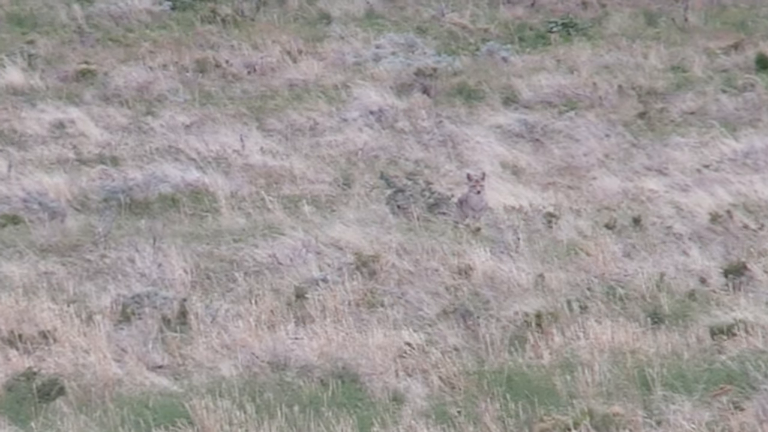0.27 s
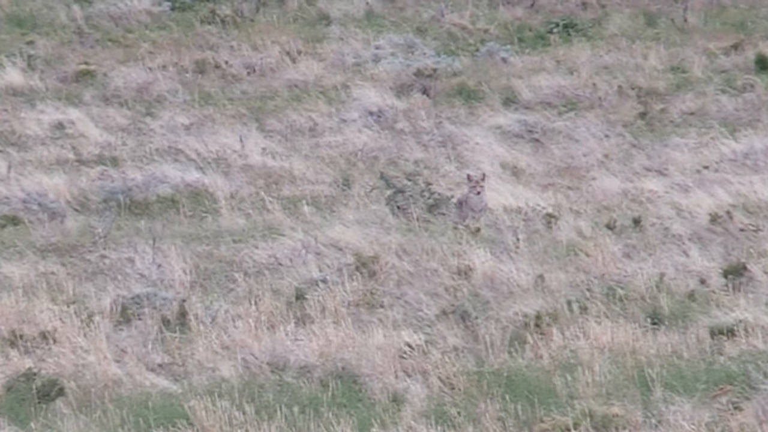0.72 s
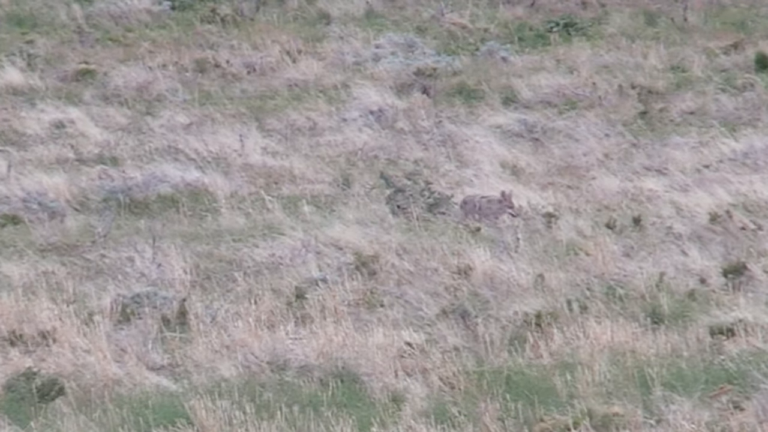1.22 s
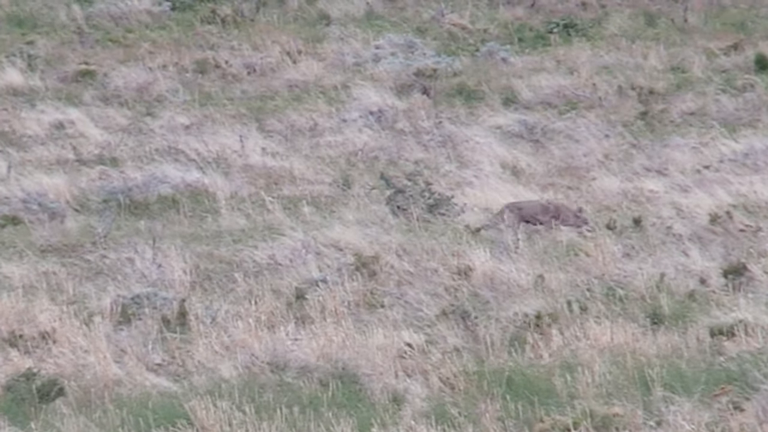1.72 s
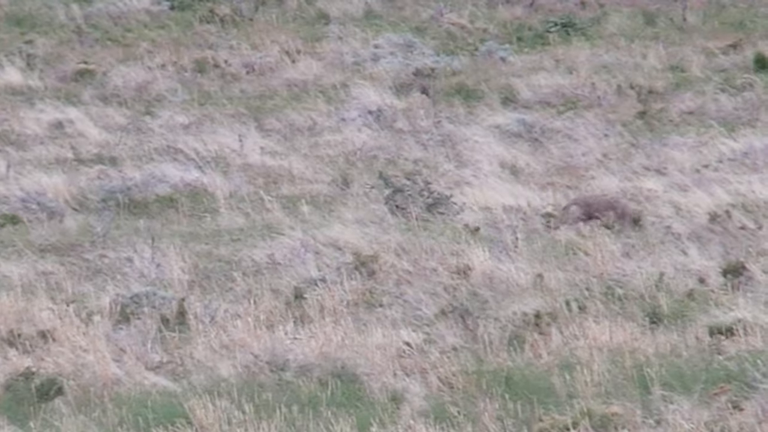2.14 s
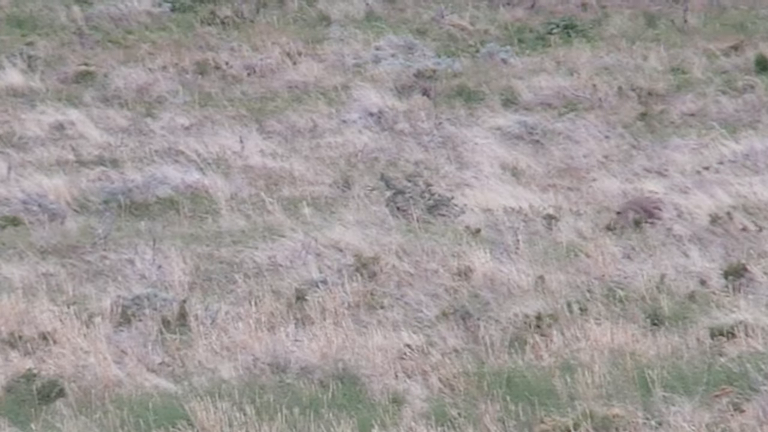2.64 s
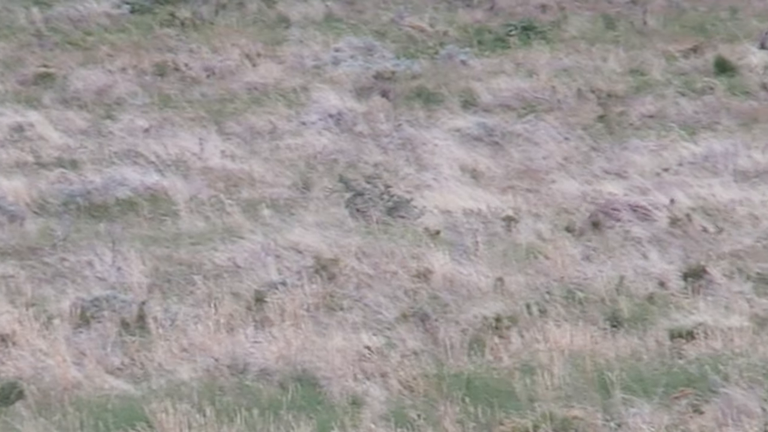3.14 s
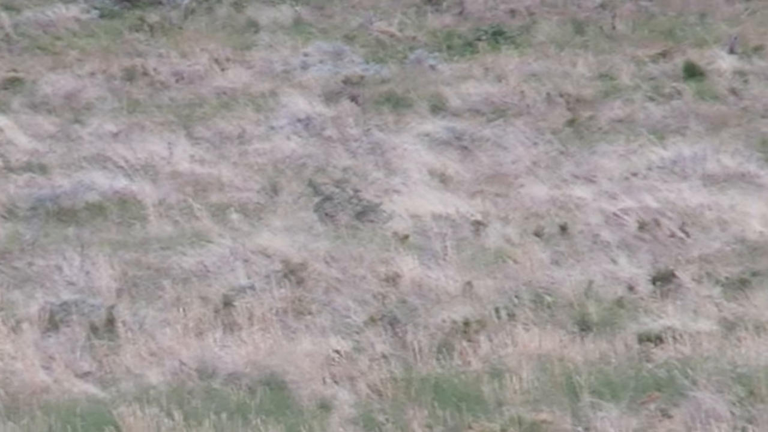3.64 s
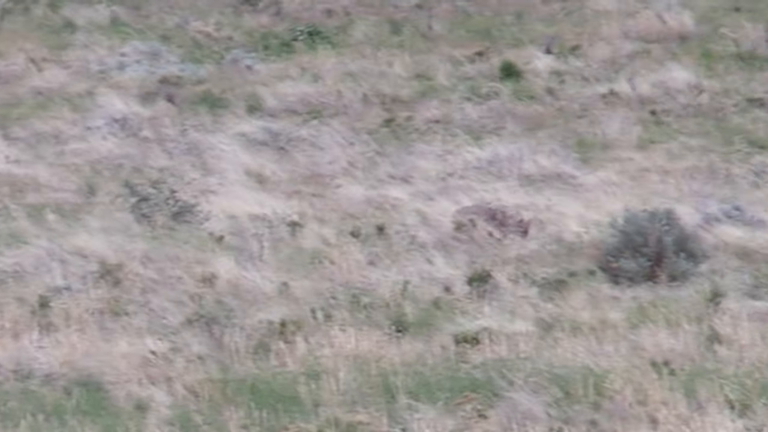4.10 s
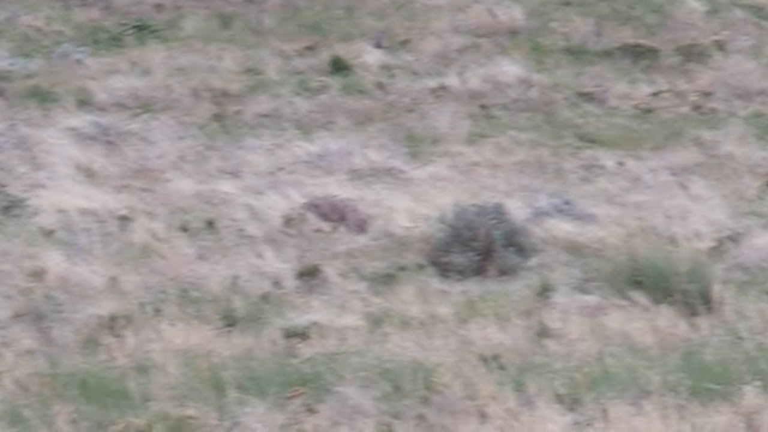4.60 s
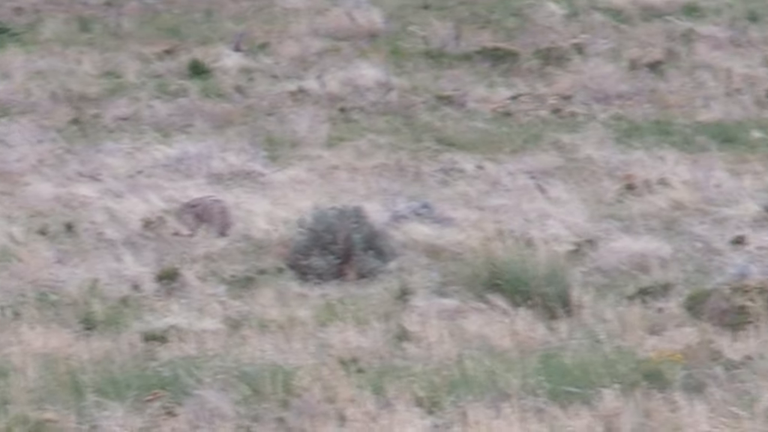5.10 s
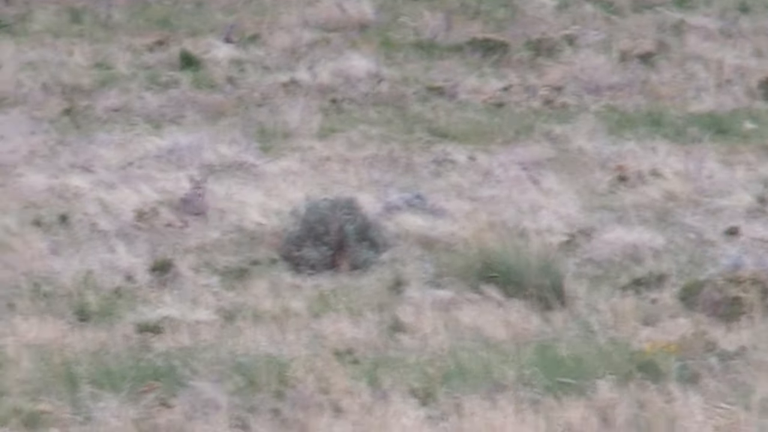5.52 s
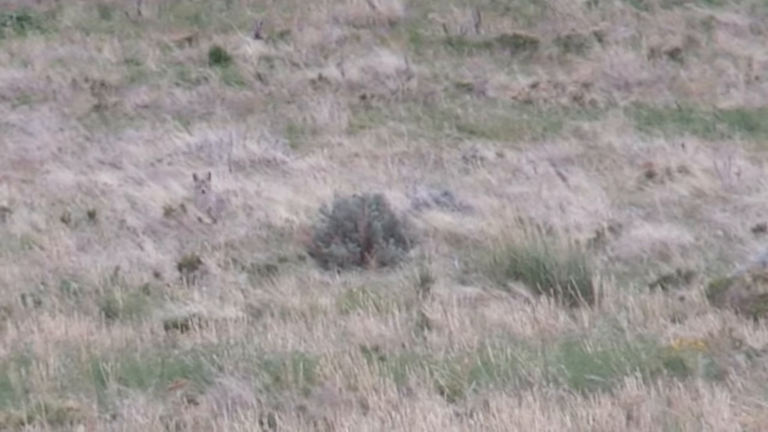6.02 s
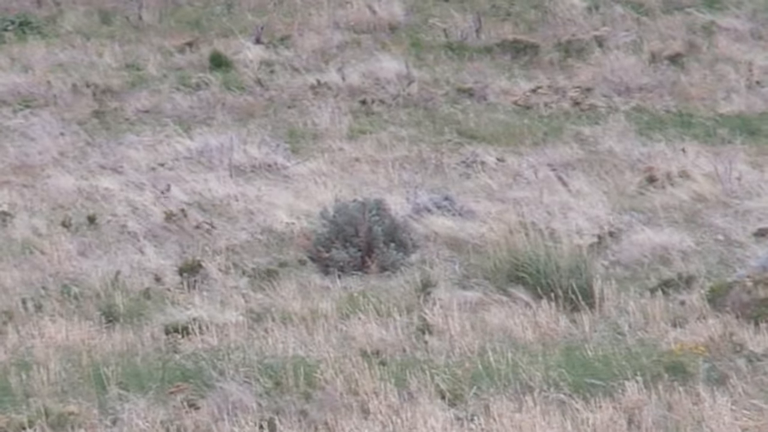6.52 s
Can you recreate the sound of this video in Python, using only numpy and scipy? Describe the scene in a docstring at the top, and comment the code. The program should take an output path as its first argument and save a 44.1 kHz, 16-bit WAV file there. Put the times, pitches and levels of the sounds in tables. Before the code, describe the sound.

Outdoors, thin wavering yips and drawn-out squeals come about three a second, a little right, with fainter calls to the left later on. Short echoes and scatter come back from the slope and brush. Deep wind buffets the camera microphone, first in loose thuds, then in near-overloading blows with a small dry tick among them. Calling ends around six seconds, leaving rumbling wind over soft hiss and hum.

```python
"""High squealing calls, clean yips, carry over an open grassy hillside, a little to the right, and echo off the slope.
Each yip is a wavering sine with patchy overtones; blurred noise taps make its echoes.
Gusts buffet the two microphone ports of a camera as shaped noise, with flaps and quick dull bursts.
Brief high glints with the yips, fainter calls to the left, a noise rasp and one damped tick lie over
the steady hiss and faint motor hum of the camera, which dip briefly at times."""
import sys
import numpy as np
from scipy import signal
from scipy.fft import rfft, irfft, next_fast_len
from scipy.io import wavfile
from scipy.ndimage import uniform_filter1d, minimum_filter1d

SR = 44100
rng = np.random.default_rng(int(sys.argv[2]) if len(sys.argv) > 2 else 0)


def voltage_ratio(level):
    """Linear amplitude factor for a level in decibels (scalar or array-like)."""
    return 10 ** (np.asarray(level, float) / 20)


def transcribe(u):
    """Save the signal u as a 16-bit wav file named by the first command-line argument.

    u: samples, shape (n,) or (channels, n), limited to [-1, 1]; the rate is SR.
    q: integer samples, one column per channel.
    """
    v = np.clip(np.atleast_2d(u).T, -1, 1)
    q = np.round(v * 32767).astype(np.int16)
    wavfile.write(sys.argv[1], SR, q)


N = 297653
TIME = np.arange(N) / SR
YIP_PAN_DB = -3.5  # left minus right

# relative colour of the eddies on a port: f/Hz, density/dB per Hz
WIND_COLOUR = [(3, -52), (12, -6), (22, 3), (45, -5.5), (75, -12), (110, -19), (200, -32.5), (330, -42.5),
               (600, -57.5), (1100, -79.5)]


def unit(x):
    """Scale to rms 1."""
    return x / np.sqrt(np.mean(x ** 2))


def read(table, hz):
    """dB of a spectrum, straight lines over log frequency."""
    table_hz, table_db = np.transpose(table)
    return np.interp(np.log(hz + 1e-9), np.log(table_hz), table_db)


def noise(table, lo_hz=0, hi_hz=1e9):
    """Noise with the table's colour, kept between two soft edges."""
    size = next_fast_len(N)
    hz = np.arange(size // 2 + 1) * SR / size + 1e-3
    edges = 1 / np.sqrt((1 + (lo_hz / hz) ** 8) * (1 + (hz / hi_hz) ** 8))
    white = rfft(rng.standard_normal(size))
    return irfft(white * voltage_ratio(read(table, hz)) * edges, size)[:N]


def walk(rate):
    """Random levels held 1 / rate s and slewed twice; rms 1."""
    hold = int(SR / rate)
    steps = np.repeat(rng.standard_normal(N // hold + 1), hold)
    return unit(uniform_filter1d(uniform_filter1d(steps, hold), hold)[:N])


def pan(x, db):
    """Place left or right by a level difference (left minus right)."""
    return np.array([x * voltage_ratio(db / 2), x * voltage_ratio(-db / 2)])


def fade(t, s):
    """Soft edges of s seconds on a note."""
    return np.clip(np.minimum(t - t[0], t[-1] - t) / s, 0, 1)


def bumps(table, column):
    """Sum of bell-shaped swells from rows (t/s, half width/s, ..)."""
    return sum(row[column] * np.exp(-((TIME - row[0]) / row[1]) ** 2) for row in table)


def yips():
    """High squealing calls: a near sine that wavers, roughens in fast glides, with two patchy overtones."""
    # one entry a yip: overtone brightness/dB, then its course of (t/s, pitch f/Hz, effort level/dB)
    courses = [ (-4, [(0.0, 1652, -50), (0.019, 1890, -32), (0.038, 1965, -35), (0.053, 2340, -42),
               (0.062, 2350, -59)]), (-5, [(0.355, 1250, -66), (0.364, 1290, -45), (0.376, 1713, -30.5),
               (0.388, 1710, -31), (0.396, 1855, -35), (0.409, 1850, -56)]), (0.5, [(0.628, 1350, -42),
               (0.635, 1322, -36), (0.655, 1500, -40), (0.663, 1780, -38), (0.674, 1900, -32.5),
               (0.691, 2004, -42), (0.702, 2135, -36), (0.719, 1950, -57)]), (-8, [(0.745, 2520, -60),
               (0.766, 2520, -47.5), (0.78, 2670, -53), (0.829, 2800, -58), (0.838, 2650, -70),
               (0.845, 2010, -36), (0.852, 1990, -65)]), (-3.5, [(0.955, 1750, -57), (0.961, 1737, -39.5),
               (0.977, 1783, -42), (0.989, 1870, -32), (1.02, 2014, -30.5), (1.034, 2140, -41),
               (1.063, 2050, -29.5), (1.086, 1837, -38), (1.14, 1886, -38), (1.156, 2060, -44),
               (1.161, 2680, -44), (1.172, 2660, -47.5), (1.183, 2040, -41), (1.192, 2050, -64)]),
               (-3.5, [(1.282, 1290, -54), (1.293, 1288, -44.5), (1.326, 1502, -37.5), (1.353, 1515, -40),
               (1.366, 1620, -34), (1.396, 1744, -35), (1.408, 1835, -45), (1.424, 2360, -53),
               (1.44, 2100, -47.5), (1.455, 1970, -51)]), (-5, [(1.56, 1630, -55), (1.567, 1542, -31.5),
               (1.597, 1765, -39), (1.607, 1970, -38), (1.613, 2550, -46), (1.628, 2420, -49),
               (1.645, 2696, -37), (1.714, 2686, -31), (1.775, 2762, -35.5), (1.797, 1870, -38.5)]),
               (1.5, [(1.922, 1940, -58), (1.927, 1965, -25), (1.935, 1878, -33), (1.941, 1604, -44),
               (1.959, 1820, -38), (1.968, 2150, -41), (1.999, 2560, -34), (2.009, 2700, -37),
               (2.048, 2530, -30), (2.128, 2490, -42.5), (2.157, 2620, -38.5), (2.169, 2930, -40),
               (2.191, 2100, -39.5), (2.2, 1960, -66)]), (-0.5, [(2.309, 1620, -39), (2.313, 1600, -28.5),
               (2.318, 1336, -43), (2.335, 1480, -48.5), (2.354, 1836, -38.5), (2.36, 2110, -37.5),
               (2.37, 2310, -44), (2.389, 2510, -40), (2.395, 2760, -36.5), (2.423, 2474, -34),
               (2.456, 2460, -35.5), (2.485, 2855, -36.5), (2.528, 2885, -42), (2.543, 2190, -34.5),
               (2.554, 2330, -67)]), (1, [(2.669, 1825, -42), (2.675, 1804, -31.5), (2.685, 1626, -34.5),
               (2.712, 1873, -34.5), (2.72, 1890, -45), (2.727, 2660, -42), (2.745, 2770, -41),
               (2.783, 2670, -28.5), (2.794, 2784, -41.5), (2.85, 2810, -48.5), (2.893, 2910, -57),
               (2.904, 2660, -36.5), (2.915, 2180, -47), (2.924, 2210, -59)]), (0, [(3.055, 1680, -48),
               (3.071, 1570, -32), (3.092, 1768, -39), (3.105, 1776, -40), (3.11, 2700, -40),
               (3.141, 2780, -51), (3.156, 2620, -35.5), (3.185, 2710, -37), (3.305, 2834, -44.5),
               (3.337, 1940, -49.5)]), (0, [(3.469, 1060, -54), (3.478, 1073, -41), (3.486, 1204, -40.5),
               (3.514, 1385, -46), (3.521, 1592, -47), (3.538, 1863, -38), (3.546, 2300, -39),
               (3.575, 2466, -37.5), (3.605, 2390, -37.5), (3.678, 2600, -34.5), (3.712, 2420, -40),
               (3.72, 2670, -43), (3.76, 2700, -61)]), (-2, [(3.895, 1148, -47), (3.906, 1178, -44),
               (3.914, 1280, -45), (3.93, 1425, -47.5), (3.941, 1805, -42), (3.946, 2270, -36),
               (3.972, 2600, -36), (3.989, 2380, -45), (4.01, 2410, -57), (4.034, 2190, -35.5),
               (4.056, 2400, -33), (4.129, 2543, -34.5), (4.146, 2690, -56), (4.16, 2620, -36),
               (4.169, 2440, -36), (4.21, 2600, -37), (4.228, 1870, -51)]), (-11, [(4.349, 1660, -60),
               (4.359, 1730, -45), (4.372, 1590, -57), (4.377, 1470, -56), (4.39, 2030, -33.5),
               (4.401, 2026, -44), (4.406, 2680, -46.5), (4.44, 2680, -51), (4.455, 2430, -37),
               (4.473, 2330, -55), (4.481, 2427, -37.5), (4.501, 2465, -37), (4.512, 2570, -41.5),
               (4.6, 2565, -44.5), (4.615, 2650, -56), (4.7, 2630, -63)]), (-4, [(4.808, 1550, -54),
               (4.813, 1552, -44.5), (4.824, 1712, -28), (4.837, 1786, -44), (4.842, 2214, -45),
               (4.858, 2220, -47), (4.893, 1960, -49), (4.92, 2000, -55)]), (-8, [(4.968, 1320, -58),
               (4.976, 1317, -50), (4.988, 1463, -54), (4.993, 1900, -47), (5.027, 2044, -32),
               (5.052, 1970, -57), (5.067, 2013, -51), (5.085, 2030, -65)]), (-20, [(5.12, 1980, -58),
               (5.14, 1960, -43), (5.153, 2100, -35), (5.166, 2660, -56), (5.173, 2670, -42),
               (5.189, 2680, -59)]), (-11, [(5.346, 1250, -47), (5.358, 1377, -41), (5.371, 1706, -51),
               (5.379, 1970, -37.5), (5.389, 2100, -39), (5.406, 2380, -62), (5.423, 2390, -59),
               (5.435, 2200, -40), (5.449, 2490, -52), (5.491, 2595, -39), (5.509, 2730, -60)]),
               (-15, [(5.53, 2570, -68), (5.562, 2520, -62), (5.569, 2300, -58), (5.609, 2260, -56)]),
               (-12.5, [(5.643, 1500, -58), (5.651, 1500, -49), (5.658, 1320, -46), (5.664, 1320, -40),
               (5.678, 1466, -41), (5.684, 1680, -50), (5.692, 1910, -35.5), (5.704, 1965, -48),
               (5.709, 2080, -41), (5.724, 2264, -38.5), (5.736, 2220, -74), (5.757, 2240, -64),
               (5.764, 2460, -51), (5.83, 2740, -60)]), (-25, [(5.97, 1326, -63), (5.99, 1296, -42),
               (6.005, 1506, -44), (6.015, 1660, -60), (6.021, 1820, -45), (6.034, 1826, -37.5),
               (6.045, 1640, -55), (6.064, 1640, -64)]), ]
    # overtones, rich in the low register and nearly gone in the squeal:
    # pitch f/Hz, level/dB before brightness and swells
    overtones = [(1075, -41), (1330, -40), (1480, -46), (1700, -54), (1830, -41), (1990, -52), (2140, -42),
                 (2300, -57), (2500, -66), (2800, -65)]
    # the overtones swell or drop for a moment: t/s, half width/s, change of level/dB
    overtone_swells = [(.68, 0.023, 6), (1.0, 0.016, -18), (1.08, 0.082, 3.5), (1.62, 0.0089, -6),
                       (1.69, .05, 12), (1.99, 0.01, 8), (2.1, 0.031, 14), (4, .02, -8), (4.81, .02, 5),
                       (5.36, 0.014, -10), (5.4, 0.017, 7), (5.685, 0.0077, 11)]
    # pass for the third partial: f/Hz, level/dB
    third_pass = [(3000, -15), (3600, -13.5), (4300, -3.5), (4700, -13), (5100, -30)]
    # resonance that lifts the second partial: f/Hz, half width/Hz, lift/dB
    peak_hz, peak_width_hz, peak_lift_db = (2780, 120, 2.4)
    faint_db = -44.5  # under this effort the overtones fade with the fundamental
    knee_db = -56  # overtones below this level fall away faster
    fall_dull_db, jump_dip_db = -9, -9

    out = np.zeros(N)
    drift = 0.0052 * walk(120)  # fraction of pitch
    swell = voltage_ratio(2 * walk(90))
    shake = .045 * walk(500)  # fraction of pitch
    patches_db = 3.5 * np.array([walk(70), walk(70)])
    swell_db = bumps(overtone_swells, column=2)
    for bright_db, course in courses:
        s, hz, db = np.transpose(course)
        span = slice(int(s[0] * SR), int(s[-1] * SR))
        t = TIME[span]
        pitch = uniform_filter1d(np.interp(t, s, hz), 120)
        glide = np.gradient(np.log2(pitch)) * SR  # octaves a second
        # the tone roughens in fast glides (full at 30 octaves a second)
        rough = np.clip(uniform_filter1d(np.abs(glide), 300) / 30, 0, 1)
        # the fundamental dips where the note jumps to another register
        jumping = np.clip(np.abs(glide) / 40 - 1, 0, 1)
        phase = 2 * np.pi * np.cumsum(pitch * (1 + drift[span] + rough * shake[span])) / SR
        effort_db = np.interp(t, s, db)

        over_db = bright_db + read(overtones, pitch) + swell_db[span]
        over_db += np.minimum(effort_db - faint_db, 0)
        # duller while the pitch drops away (from 8, full at 16 octaves a second)
        over_db += fall_dull_db * np.clip(-glide / 8 - 1, 0, 1)
        # weak overtones fall away faster
        over_db += 1.5 * np.minimum(over_db - knee_db, 0)
        peak_db = peak_lift_db * np.exp(-((2 * pitch - peak_hz) / peak_width_hz) ** 2)
        pass_db = read(third_pass, 3 * pitch)

        first = voltage_ratio(effort_db + jump_dip_db * jumping) * np.sin(phase)
        second = voltage_ratio(over_db + peak_db + patches_db[0, span]) * np.sin(2 * phase)
        third = voltage_ratio(over_db + pass_db + patches_db[1, span]) * np.sin(3 * phase)
        out[span] += np.sqrt(2) * (first + second + third) * swell[span] * fade(t, 0.0036)
    return out


def wind():
    """Eddies on each port: a deep thump and a quicker flutter that comes in puffs."""
    # wind on the ports, before the trims below: t/s, strength level/dB, flutter over strength level/dB,
    # left minus right/dB
    gusts = [(0.0, -22.5, -12.5, -10), (0.2, -26.5, -17, -2.5), (0.75, -27.5, -24.5, -6.5),
             (1.13, -25.5, -14, -3.5), (1.35, -26.5, -21.5, -1), (1.599, -25.5, -26, -5.5),
             (1.93, -35, -22, 1), (2.029, -12, -16.5, -10), (2.2, -28.5, -12.5, 0.5),
             (2.5, -26.5, -17, -0.5), (2.76, -30.5, -23, -3), (2.97, -23.5, -16.5, -2),
             (3.23, -27.5, -28, -6.5), (3.8, -30.5, -25, -2), (4.05, -22, -28.5, -4.5),
             (4.4, -20, -16, 2.5), (4.61, -23.5, -15.5, -3), (4.87, -5.5, -19.5, 0),
             (5.02, -18, -19.5, 3.5), (5.19, -7, -16.5, -0.5), (5.49, -14.5, -16, 0.5),
             (5.63, -16, -18, -2.5), (5.8, -10.5, -18, 0), (6.0, -13.5, -14, 0.5), (6.2, -23.5, -13, -2),
             (6.75, -27.5, -16, -6.5)]
    # single deep shoves on top of the gusts: t/s, half width/s, thump lift level/dB, added left minus right/dB
    shoves = [(.09, 0.046, 3.5, 7), (.82, 0.044, 4.5, 8.5), (2.31, 0.082, 14.5, 0),
              (2.59, .035, 10.5, -4.5), (3.63, 0.12, 5.5, 1), (4.1, .03, -4, -3), (4.29, 0.036, 6, -3),
              (4.4, 0.012, 5, -6), (4.5, .04, 6, 0.5), (5.54, 0.033, 2, -3), (5.87, 0.035, 4, -1),
              (6.04, 0.037, 2.5, 1), (6.22, 0.053, 3.5, -1), (6.36, 0.049, 6.5, 5), (6.51, 0.03, 8, -3.5),
              (6.75, 0.023, 5.5, -9)]
    s, *columns = np.transpose(gusts)
    strength_db, flutter_db, pan_db = (np.interp(TIME, s, c) for c in columns)
    shove = voltage_ratio(bumps(shoves, column=2))
    pan_db = pan_db + bumps(shoves, column=3)
    flutter_pan_db = -3.5
    ports = []
    for side in (1, -1):
        puffs = walk(22)
        thump = unit(noise(WIND_COLOUR, hi_hz=96.5) * voltage_ratio(2.9 * puffs + 1.0 * walk(9)))
        flutter = unit(noise(WIND_COLOUR, lo_hz=92.7, hi_hz=295) * voltage_ratio(3.4 * puffs + 2.4 * walk(30)))
        # the finest eddies break out mostly at the tops of the puffs
        whip = unit(noise(WIND_COLOUR, lo_hz=318) * voltage_ratio(6.2 * puffs + 3.3 * walk(40)))
        push = voltage_ratio(4.0) * shove * thump
        push += voltage_ratio(flutter_db + 7.5 + side * flutter_pan_db / 2) * flutter
        push += voltage_ratio(.5 * flutter_db - 25) * whip
        ports.append(push)
    left, right = ports
    # an eddy rolls across the body: the right port feels part of the left one's push over a quarter turn later
    lag_rad, link = 1.814, 0.6
    rolled = np.real(signal.hilbert(left, next_fast_len(N))[:N] * np.exp(-1j * lag_rad))
    right = link * rolled + np.sqrt(1 - link ** 2) * right
    return np.array([left * voltage_ratio(strength_db + pan_db / 2), right * voltage_ratio(strength_db - pan_db / 2)])


def camera():
    """Hiss partly shared by both sides, and the hum of a small motor as steady partials that waver in level."""
    # relative colour of the hiss: f/Hz, density/dB per Hz
    hiss_colour = [(150, 18), (350, 10.5), (700, 6.5), (1300, 4), (3000, 1), (8000, -1.5), (13000, -3),
                   (15800, -6)]
    # motor partials: f/Hz, level/dB
    partials = [(374, -64.5), (438, -70), (564, -71), (628, -68.5), (938, -75.5), (1001, -75.5)]
    # hiss and hum dip briefly: t/s, recovery/s, change of level/dB
    dips = [(4.79, 0.017, 0), (4.88, 0.022, 0), (5.22, 0.056, -8), (5.31, .04, -4), (5.75, 0.084, -9),
            (5.92, 0.014, -2.5), (6.01, 0.012, -6)]
    share, hiss_db, onset_s = 0.6, -47.5, 0.017
    mid, side = noise(hiss_colour, lo_hz=163), noise(hiss_colour, lo_hz=142)
    opposite = np.array([[1], [-1]])
    hiss = unit(np.sqrt(1 + share) * mid + np.sqrt(1 - share) * side * opposite)
    hum = sum(np.sqrt(2) * voltage_ratio(db + 1.7 * walk(12)) * np.sin(2 * np.pi * hz * TIME) for hz, db in partials)
    dip_db = np.zeros(N)
    for s, recovery_s, db in dips:
        dip_db += db * np.exp(-((TIME - s) / np.where(TIME < s, onset_s, recovery_s)) ** 2)
    return (hiss * voltage_ratio(hiss_db) + hum) * voltage_ratio(dip_db)


def hillside(calls):
    """A few blurred echoes shared by both ports, and a thin scatter from grass and brush, different at each."""
    # echoes off the slope: delay t/s, level/dB
    echoes = [(.045, -15), (.12, -21), (.2, -33.5)]
    scatter_t60_s, scatter_db = 0.39, -23
    t = TIME[:SR // 2]
    tail = rng.standard_normal((2, len(t))) * voltage_ratio(-60 * t / scatter_t60_s) * np.clip(t / 0.019, 0, 1)
    tail = voltage_ratio(scatter_db) * tail / np.sqrt(np.sum(tail ** 2, axis=1, keepdims=True))
    for s, db in echoes:
        blur = rng.standard_normal(len(t)) * np.exp(-((t - s) / 0.011) ** 2)
        tail += voltage_ratio(db) * blur / np.sqrt(np.sum(blur ** 2))
    # small stones and stems return the treble best
    bright = signal.lfilter(*signal.butter(2, 2100, "high", fs=SR), calls)
    return signal.fftconvolve(bright[None], tail, axes=1)[:, :N]


def glides(table, pan_db):
    """Faint gliding sines of patchy level, from rows (start, length, start Hz, end Hz, dB)."""
    out, patchy_db = np.zeros((2, N)), 2.7 * walk(50)
    for t0, length, hz0, hz1, db in table:
        t1 = t0 + length
        span = slice(int(t0 * SR), int(t1 * SR))
        t = TIME[span]
        pitch = np.interp(t, [t0, t1], [hz0, hz1])
        tone = np.sin(2 * np.pi * np.cumsum(pitch) / SR)
        out[:, span] += pan(np.sqrt(2) * voltage_ratio(db + patchy_db[span]) * tone * fade(t, 0.0044), pan_db)
    return out


def glints():
    """Brief high glints with the yips, some of them their overtones: short gliding sines."""
    # start t/s, length/s, start f/Hz, end f/Hz, level/dB
    short_glides = [(.145, 0.026, 2430, 2400, -52.5), (.535, 0.023, 2750, 2700, -52),
                    (.568, 0.018, 2730, 2630, -50), (2.712, 0.012, 3700, 4800, -48),
                    (4.855, .017, 4430, 4300, -53), (4.945, .015, 1430, 1440, -51),
                    (4.978, .014, 4250, 4400, -45), (5.355, 0.023, 4000, 4800, -50),
                    (5.368, 0.018, 3450, 3600, -48), (5.69, .02, 2200, 2200, -43),
                    (5.395, .025, 4730, 4850, -51), (5.672, .014, 4060, 4400, -57),
                    (6.1, 0.079, 1344, 1440, -57), (6.2, 0.032, 1500, 1430, -65)]
    return glides(short_glides, YIP_PAN_DB)


def rasp():
    """A short patchy rasp of coloured noise, a little to the right."""
    # course: t/s, level/dB
    course = [(.41, -60), (.47, -50.5), (.57, -51.5), (.66, -51), (.76, -57)]
    # relative colour: f/Hz, density/dB per Hz
    colour = [(900, -12), (1500, -1), (2700, 0), (3600, -5), (5000, -19)]
    air = unit(noise(colour) * voltage_ratio(1.6 * walk(58.3)))
    level_db = np.interp(TIME, *np.transpose(course), left=-120, right=-120)
    return pan(air * voltage_ratio(level_db), -4.0)


def flaps():
    """The air flaps at a port's rim: short bursts of narrow noise with a sudden start."""
    # start t/s, length/s, level/dB, left minus right/dB
    flutters = [(2.064, 0.16, -33.5, 3), (2.805, 0.095, -42, -2)]
    out = np.zeros((2, N))
    hz, width = 252, 76  # centre and bandwidth, Hz
    band = [(hz / 4, -40), (max(hz - width / 2, hz / 3), 0), (hz + width / 2, 0), (2 * hz + width, -35)]
    for s, length, db, pan_db in flutters:
        t = TIME - s
        shape = np.clip(t / 0.0044, 0, 1) * np.clip(1.5 - 1.56 * t / length, 0, 1)
        out += [unit(noise(band)) * shape * voltage_ratio(db + side * pan_db / 2) for side in (1, -1)]
    return out


def bursts():
    """Eddies that burst on a port: quick dull puffs of noise that reach above the rumble."""
    # start t/s, level at the height of the puff/dB, left minus right/dB
    puffs = [(4.758, -36, 0.5), (4.91, -41, -7.5), (5.073, -39, -8), (5.256, -32, -3.5), (5.342, -42, -4.0),
             (5.4, -31.5, -11), (5.571, -41, 0.0), (5.733, -33, 2.5), (5.93, -40, -1)]
    out = np.zeros((2, N))
    air = unit(noise(WIND_COLOUR, lo_hz=252))
    for s, db, pan_db in puffs:
        t = np.maximum(TIME - s, 0) / .005  # full after 5 ms
        out += pan(air * voltage_ratio(db) * t * np.exp(1 - t), pan_db)
    return out


def left_calls():
    """Fainter calls off to the left: gliding sines."""
    # start t/s, length/s, start f/Hz, end f/Hz, level/dB
    far_glides = [(4.845, 0.07, 2510, 2490, -53.5), (5.05, .05, 2360, 2370, -62),
                  (5.535, 0.03, 3650, 2680, -54.5), (5.775, .22, 3150, 3040, -63.5)]
    return glides(far_glides, 9)


def tick():
    """One dry tick near the right port: a damped cosine pulse with a small, slower bounce."""
    # level on the right/dB, left minus right/dB, f/Hz
    db, pan_db, hz = (-18, -9, 1900)
    t = TIME - 5.0434

    def pulse(t):
        return np.exp(-(t * hz * 4.0) ** 2) * np.cos(2 * np.pi * hz * t)

    bounce = 0.61 * pulse(0.54 * (t - .0012))
    return pan(voltage_ratio(db + pan_db / 2) * (pulse(t) + bounce), pan_db)


def scene():
    """Calls and their echoes, wind, camera, rasp and tick."""
    dry_yips = yips()
    calls = pan(dry_yips, YIP_PAN_DB) + hillside(dry_yips) + glints() + left_calls()
    air = wind() + flaps() + bursts()
    return calls + air + camera() + rasp() + tick()


def band_limit(x):
    """A steep low-pass at the top of the band."""
    return signal.sosfilt(signal.butter(12, 15710, fs=SR, output="sos"), x)


def record(dry):
    """A limiter looks 6 ms ahead and turns both sides down together where either passes the ceiling."""
    ceiling, reach = .97, int(.006 * SR)
    need = np.minimum(1, ceiling / (np.abs(dry).max(axis=0) + 1e-9))
    gain = uniform_filter1d(minimum_filter1d(need, 2 * reach + 1), reach)
    return band_limit(dry * gain)


dry = scene()
out = record(dry)
transcribe(out)
```